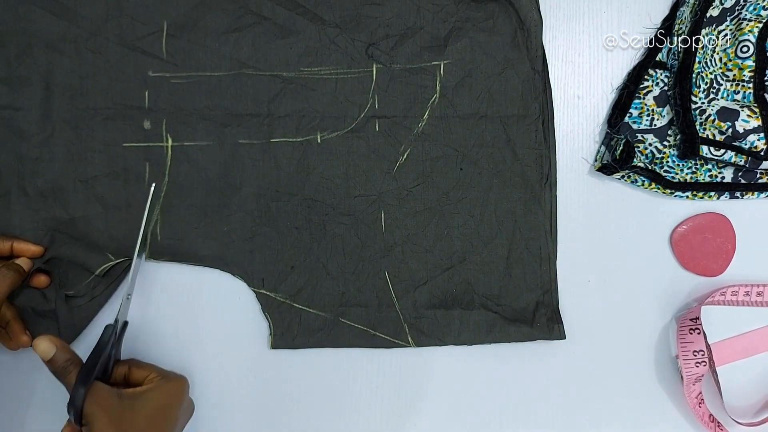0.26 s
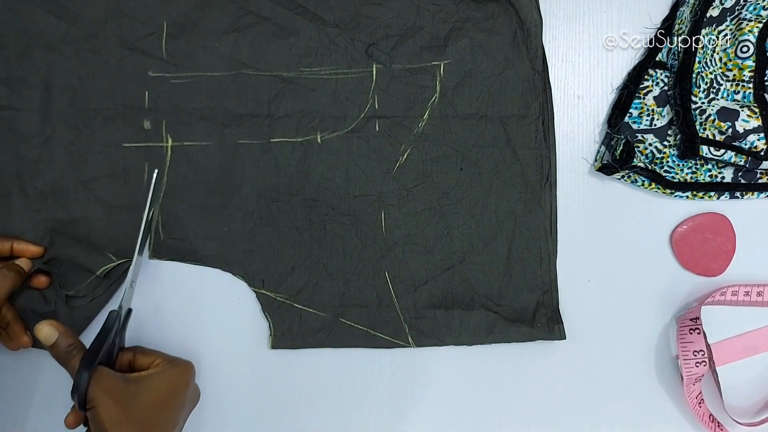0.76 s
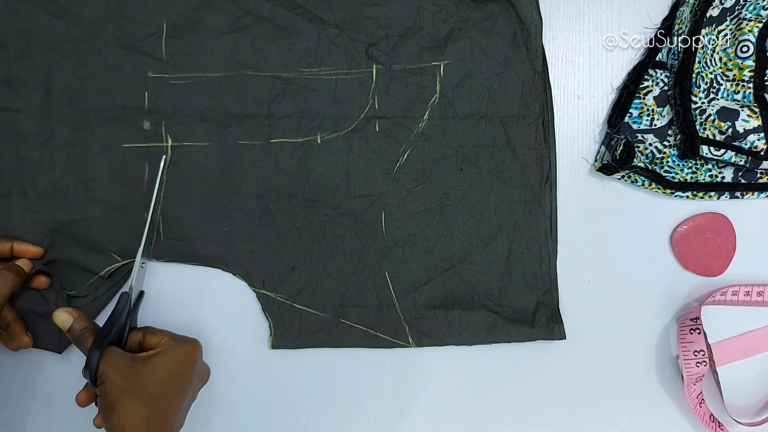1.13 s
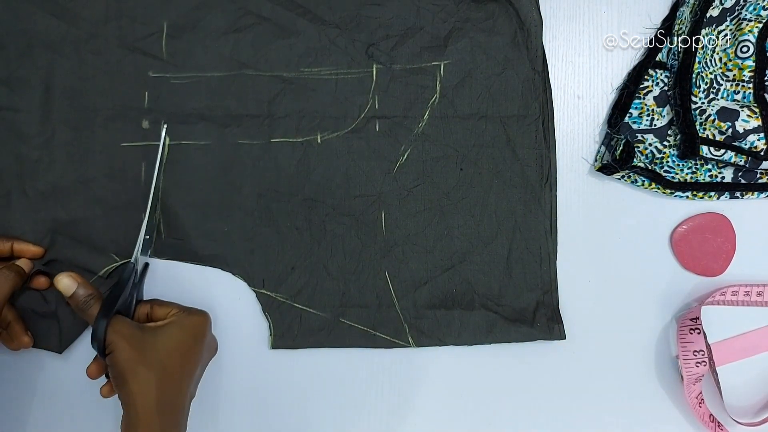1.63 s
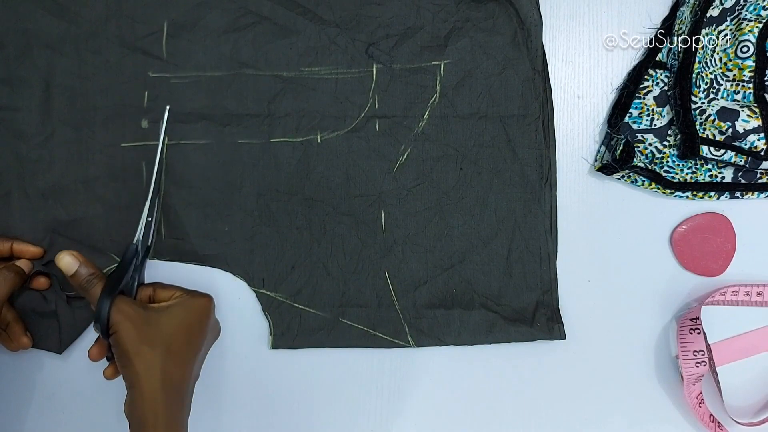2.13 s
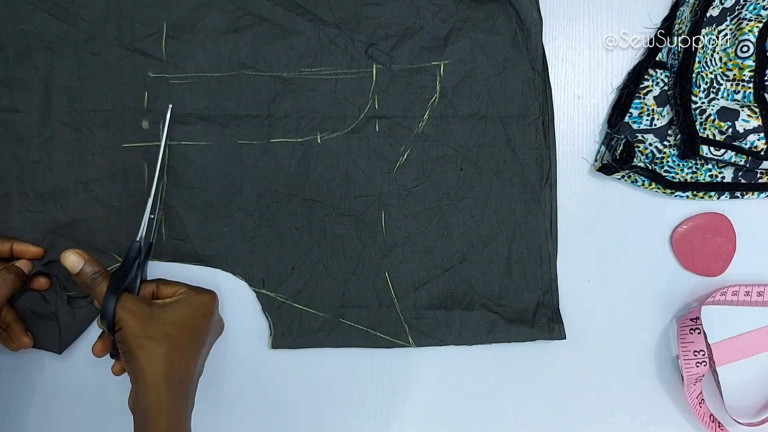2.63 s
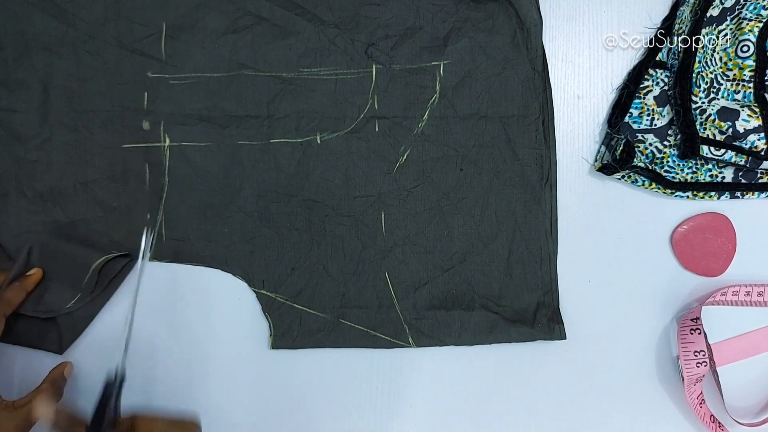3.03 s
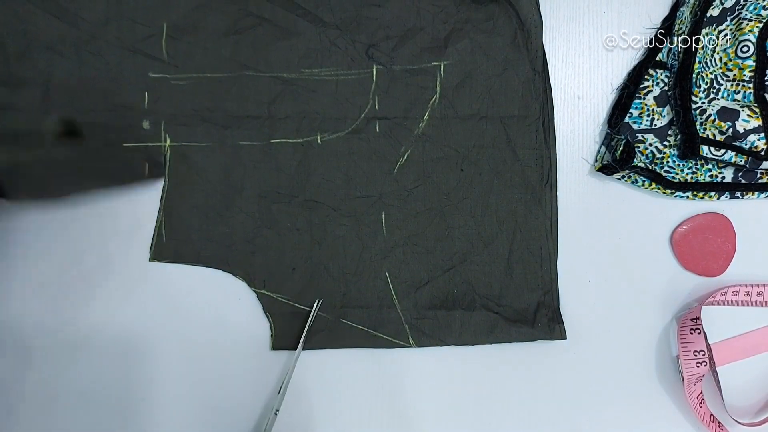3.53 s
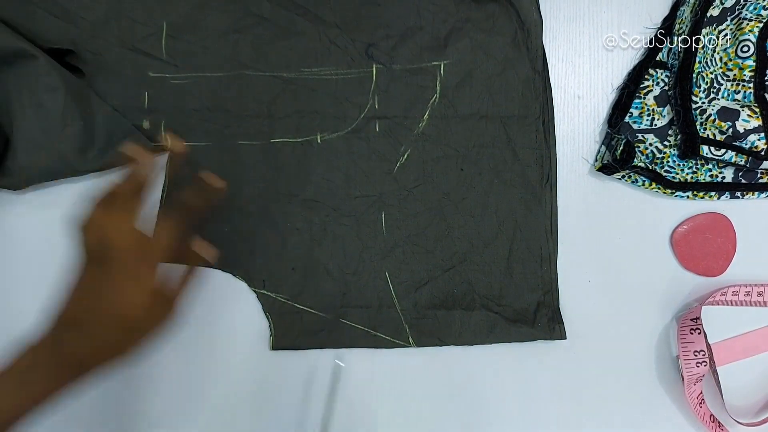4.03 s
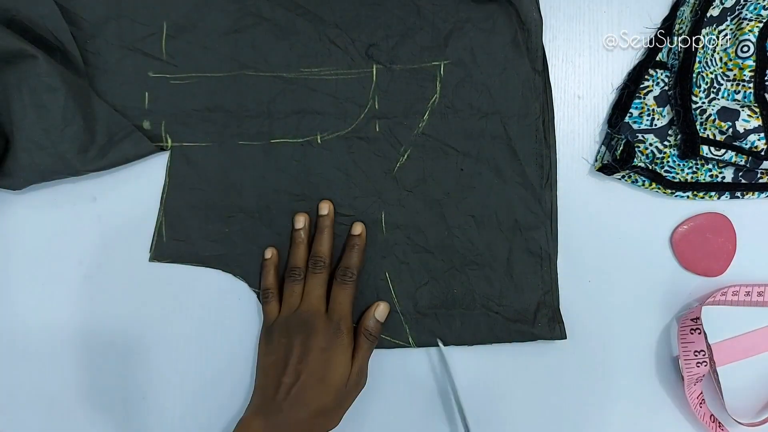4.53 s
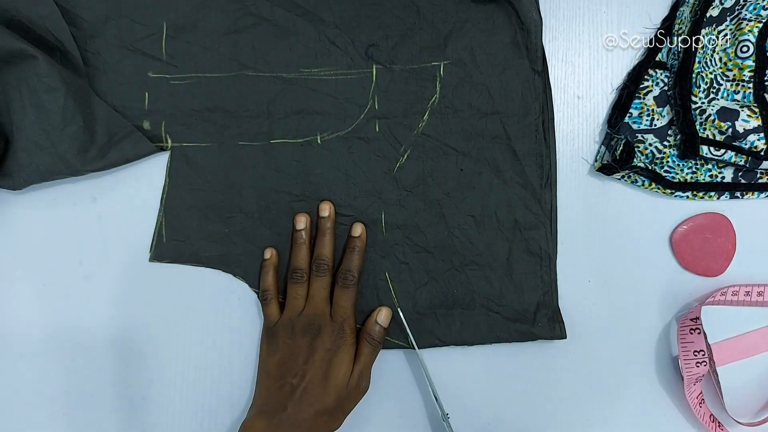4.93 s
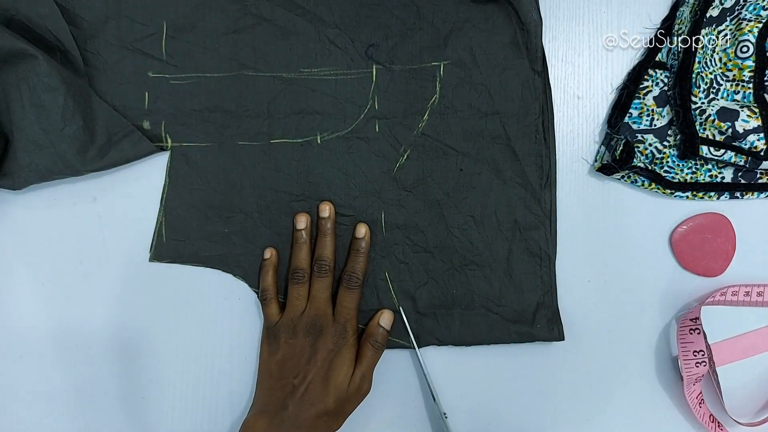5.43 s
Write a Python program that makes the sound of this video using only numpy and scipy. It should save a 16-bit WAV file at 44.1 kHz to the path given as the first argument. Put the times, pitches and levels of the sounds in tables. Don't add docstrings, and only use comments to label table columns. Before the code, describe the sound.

Close stereo sound of steel scissors cutting cloth on a hollow table in a quiet room. Crunchy snips come about every 0.6 seconds for three seconds, with small knocks between and one loud clack. Then a dull thud, faint cloth rustling, a firm landing with a short dragging rub, and a final crisp snip. Low hum and distant rumble continue underneath.

```python
import sys
import numpy as np
from scipy import signal
from scipy.fft import rfft, irfft
from scipy.io import wavfile
from scipy.ndimage import uniform_filter1d

SR = 44100
rng = np.random.default_rng(int(sys.argv[2]) if len(sys.argv) > 2 else 0)


def ratio(d):
    e = np.asarray(d, float) / 20
    return 10 ** e


def put_to_file(sound):
    columns = np.atleast_2d(sound).T
    safe = np.clip(columns, -1, 1)
    whole_steps = np.round(safe * 32767)
    wavfile.write(sys.argv[1], SR, whole_steps.astype(np.int16))


N = 250047


def evened(x):
    return x / np.sqrt(np.mean(x ** 2) + 1e-20)


def interpolated(points, hz):
    f, value = np.transpose(points)
    return np.interp(np.log(hz + 1), np.log(f + 1), value)


def causal(db):
    log_gain = np.log(ratio(np.maximum(db, -100)))
    both_sides = np.r_[log_gain, log_gain[-2:0:-1]]
    return np.exp(np.conj(signal.hilbert(both_sides)))[:len(db)]


def response(points, modes=(), modes_db=-100., lift_db=0., lift_hz=1660.0):
    hz = np.fft.rfftfreq(8192, 1 / SR)
    broad = ratio(interpolated(points, hz)) ** 2
    peaks = sum(ratio(db) ** 2 / (1 + (2 * (hz - f) / width) ** 2) ** 2 for f, width, db in modes)
    shape_db = 10 * np.log10(broad + ratio(modes_db) ** 2 * peaks + 1e-12)
    shape_db += lift_db * np.clip(5 * (hz / lift_hz - 1), 0, 1)
    h = irfft(causal(shape_db))[:3000]
    return h / np.linalg.norm(h)


def colour(x, h):
    return signal.oaconvolve(x, h)[:N]


def room(x, t60, wet_db, left_db, lag_samples=0):
    t = np.arange(4096) / SR
    echoes = rng.standard_normal((2, len(t))) * ratio(-60 * t / t60) * (t > .0005)
    echoes *= ratio(wet_db) / np.linalg.norm(echoes[0])
    echoes[:, 0] = 1
    paths = []
    for spectrum, lag in zip(rfft(echoes, 16384), (lag_samples, 0)):
        colouring_db = 20 * np.log10(abs(spectrum) + 1e-4)
        path = irfft(spectrum / causal(0.83 * colouring_db))[:len(t)]
        paths.append(np.roll(path, lag) / np.linalg.norm(path))
    return signal.oaconvolve(x[None], np.array(paths), axes=1)[:, :N] * ratio([[left_db / 2], [-left_db / 2]])


def patchy(x, patch_db, sway):
    z = signal.stft(x, nperseg=256)[2]
    blobs = rng.standard_normal((z.shape[2], z.shape[1], 2)).T
    blobs = uniform_filter1d(uniform_filter1d(blobs, size=6, axis=1), size=5, axis=2)
    level, turn = map(evened, blobs)
    fade = np.linspace(1.25, .45, z.shape[1])[:, None]
    z = z * evened(ratio(patch_db * level)) * np.exp(1j * sway * fade * np.array([turn, -turn]))
    return signal.istft(z, nperseg=256)[1][:, :N]


def snaps(per_s, spread_db):
    size = ratio(spread_db * np.minimum(rng.exponential(1, N), 4)) * rng.choice([-1., 1.], N)
    return size * (rng.random(N) < per_s / SR)


# hz, level_db (per Hz)
AIR_SPECTRUM = [(82, -31), (140, -3.5), (155, -4.5), (221, -9.5), (309, -3), (539, -11.5), (607, -16.5),
                (1020, -25.5), (1240, -28), (2690, -41.5), (7530, -45), (11200, -34), (14200, -36.5),
                (16000, -44)]
# hz, lift_db
AIR_LIFT = [(400, -0.5), (800, 4), (1500, 1), (2300, 5), (4500, 0.7)]
# hz, level_db (per Hz)
RUMBLE_SPECTRUM = [(15, -38), (30, -18), (50, -16), (80, 9), (110, 3.5), (140, -12), (200, -40), (300, -92)]
# hz, likeness (-1 to 1)
PORT_LIKENESS = [(60, 0.94), (150, 0.91), (380, 0.65), (950, 0.13), (2380, 0.049), (5980, 0.32),
                 (15000, 0.93)]


def air():
    frames, hz = N // 512 + 5, np.fft.rfftfreq(2048, 1 / SR)
    a, b, c, d, patches = rng.standard_normal((frames, 1025, 5)).T
    patches = evened(uniform_filter1d(uniform_filter1d(patches, size=24, axis=0), size=10, axis=1))
    same = np.clip(interpolated(PORT_LIKENESS, hz), -1, 1)[:, None]
    left, other = a + 1j * b, c + 1j * d
    z = np.array([left, same * left + np.sqrt(1 - same ** 2) * other])
    murmur = ratio(interpolated(AIR_SPECTRUM, hz) + interpolated(AIR_LIFT, hz))
    rumble = ratio(interpolated(RUMBLE_SPECTRUM, hz))
    z *= (murmur + rumble)[:, None] * ratio(1.3 * patches)
    noise = signal.istft(z, nperseg=2048, noverlap=1536)[1][:, :N]
    return ratio(-57) * evened(noise) * ratio([[.8], [-.8]])


# time_s, level_db
LOW_SWELLS = [(.03, -55), (.36, -52), (.56, -54), (.75, -56), (.86, -51), (1., -62), (1.19, -52),
              (1.29, -57), (1.39, -54), (1.48, -56), (1.68, -58), (1.85, -54), (1.98, -56), (2.35, -48),
              (2.55, -55), (2.7, -48), (2.84, -50), (3.03, -53), (3.17, -54), (3.34, -50), (3.82, -53),
              (4.1, -60), (4.3, -57), (4.4, -55), (4.53, -49), (4.74, -51), (4.83, -52), (5., -60),
              (5.33, -56), (5.52, -60)]
# time_s, level_db
HIGH_SWELLS = [(.08, -51), (.2, -50), (.37, -49), (.52, -52), (.63, -45), (.74, -53), (.88, -47),
               (1.11, -54), (1.24, -45), (1.39, -49), (1.73, -45), (1.93, -47), (2.27, -49), (2.44, -48),
               (2.73, -51), (2.9, -55), (3.08, -54), (3.27, -48), (3.49, -46), (3.79, -49), (3.99, -52),
               (4.25, -49), (4.45, -45), (4.6, -52), (4.76, -49), (4.99, -49), (5.1, -53), (5.36, -42),
               (5.52, -48)]


def hum():
    out, t = np.zeros(N), np.arange(N) / SR
    # pitch_hz, width_hz, swells, swell half-length_s, steady level_db
    modes = [(64., 3., LOW_SWELLS, .042, -67), (101.6, 1.5, HIGH_SWELLS, .038, -57.5)]
    for hz, width_hz, swells, swell_s, steady_db in modes:
        slow = uniform_filter1d(uniform_filter1d(rng.standard_normal(N), size=3000), size=3000)
        wander = width_hz * evened(slow)
        power = ratio(steady_db) ** 2
        power += sum(ratio(top_db) ** 2 * np.exp(-((t - s) / swell_s) ** 2) for s, top_db in swells)
        out += np.sqrt(2 * power) * np.sin(2 * np.pi * np.cumsum(hz + wander) / SR)
    return np.array([np.roll(out, 5), out]) * ratio([[.6], [-.6]])


def toot():
    start_s, end_s, level_db = 2.125, 2.295, -49.5
    pitch_hz, sag_hz_per_s, throbs_per_s = 422, -50, 20
    t = np.arange(N) / SR - start_s
    held = np.clip(np.minimum(t, end_s - start_s - t) / .015 + 1, 0, 1)
    throb = 1 + .55 * np.cos(2 * np.pi * throbs_per_s * (t - .012))
    turn = 2 * np.pi * (pitch_hz + sag_hz_per_s * t / 2) * t
    tone = np.sin(turn) + ratio(-30) * np.sin(2 * turn) + ratio(-30) * np.sin(3 * turn)
    return np.sqrt(2) * ratio(level_db - 35 * np.maximum(t - .06, 0)) * held * throb * tone


def thrum():
    middle_s, half_s, pitch_hz, level_db = 1.82, .05, 174, -52
    t = np.arange(N) / SR - middle_s
    return np.sqrt(2) * ratio(level_db) * np.exp(-(t / half_s) ** 2) * np.sin(2 * np.pi * pitch_hz * t)


# hz, level_db (per Hz)
SCRAPE_SPECTRUM = [(1120, -37), (1900, -1), (2050, 0), (2700, -5), (4540, -14), (6000, -15), (7800, -47),
                   (13200, -120)]


def drag():
    start_s, end_s, mode_hz, width_hz = 4.41, 4.75, 530, 120
    since = np.arange(N) / SR - start_s
    stroke = np.sin(np.pi * np.clip(since / (end_s - start_s), 0, 1) ** .8) ** 2
    mode = response([(0, -100), (1, -100)], [(mode_hz, width_hz, 0)], modes_db=0)
    slowing = (since > 0) * np.clip(1.3 - since / 0.39, 0, 1.3)
    grip = 1 + 4 * np.exp(-abs(since) / .02)
    slips = colour(evened(snaps(per_s=700, spread_db=2.0)), mode)
    rasp = colour(evened(snaps(per_s=6000, spread_db=3.0)), response(SCRAPE_SPECTRUM))
    return ratio(-36.5) * stroke * slips + ratio(-57.5) * slowing * grip * rasp


def strokes(rows, shape, parts_db, crisp=(0, 0, 1, 1)):
    rise, growth_db, fall = shape
    eager = (1, 1, 1.1, .45)
    quick = (1, 1, .9, 1.25)
    t, out = np.arange(N) / SR, np.zeros((4, N))
    for start, end, db, crisp_db in rows:
        near = slice(max(round((start - .3) * SR), 0), round((end + .4) * SR))
        left = np.clip((end - t[near]) / (end - start), 0, 1)
        level_db = db - growth_db * np.outer(eager, left)
        level_db -= rise * np.maximum(start - t[near], 0)
        level_db = level_db - fall * np.outer(quick, np.maximum(t[near] - end, 0))
        share_db = np.array(parts_db) + crisp_db * np.array(crisp)
        out[:, near] += ratio(level_db + share_db[:, None]) ** 2
    return out


# bite_s, shut_s, effort_db, crispness_db
SNIPS = [
    (-.06, .014, -42, 0),
    (.518, .585, -41, 0.5),
    (1.105, 1.165, -43, 3),
    (1.703, 1.785, -43, 2),
    (2.308, 2.372, -44.5, 1),
    (2.94, 2.992, -50.5, -2),
    (5.314, 5.395, -45, 3),
]
# start_s, end_s, effort_db, crispness_db
NUDGES = [(.125, .165, -51, 0), (.3, .39, -68, 4), (.712, .778, -50.5, -1), (1.32, 1.38, -55, 2),
          (1.9, 1.96, -51, 1), (2.125, 2.23, -61, -3), (2.496, 2.51, -60, 3), (2.96, 3.0, -56, 11),
          (4.47, 4.56, -47, 7), (4.58, 4.67, -52, 3), (4.755, 4.765, -57, -2), (5.168, 5.18, -70, 3),
          (5.58, 5.618, -46.5, 1)]
# start_s, end_s, effort_db, blade_drag_db
BRUSHES = [(.2, .46, -80, 8), (.8, .96, -81, 3), (2.89, 2.95, -69, 6), (3.05, 3.18, -76, 15),
           (3.25, 3.4, -79, 5), (3.43, 3.54, -77, 20), (3.7, 4.05, -79, 0), (4.135, 4.155, -60.5, 3),
           (4.2, 4.36, -77, 13), (4.49, 4.55, -63, 0), (4.6, 4.69, -59.5, 0), (4.75, 4.835, -54, 0)]
# start_s, end_s, effort_db, crispness_db
LANDINGS = [
    (1.171, 1.19, -37, -1),
    (5.373, 5.388, -45, 8),
    (1.297, 1.305, -51, 3),
    (3.496, 3.503, -42, -26),
    (4.411, 4.418, -41, 2),
    (5.568, 5.578, -48, 0),
]


def action():
    slow = uniform_filter1d(uniform_filter1d(rng.standard_normal(N), size=1500), size=1500)
    resting_db, fidget_db = (-66, -80, -94, -94), (2.5, 3, 2, 2)
    power = ratio(np.array(resting_db)[:, None] + np.outer(fidget_db, evened(slow))) ** 2
    power += strokes(SNIPS, shape=(950, 7, 195), parts_db=(0.5, 0, -5.5, -9))
    power += strokes(NUDGES, shape=(700, 1, 260), parts_db=(-2, 0, -10, -22))
    power += strokes(LANDINGS, shape=(9000, 0, 230), parts_db=(-4, -2, -5, -15), crisp=(-.22, .1, 1, 1))
    power += strokes(BRUSHES, shape=(260, 2, 190), parts_db=(-15, -15, -14, 0), crisp=(0, 0, 1, 0))
    return 10 * np.log10(power)


# time_s, peak_db, brightness_db, ring_t60_s
KNOCKS = [(0.118, -42, -17, 0.049), (0.287, -54, -17, 0.055), (0.506, -41.5, -8, 0.053),
          (0.708, -37, -16, 0.067), (0.957, -57, -17, 0.06), (1.079, -40.5, -16, 0.049),
          (1.127, -29.5, -21, 0.06), (1.17, -23.5, -11.5, 0.1), (1.295, -38.5, -9, 0.074),
          (1.671, -47, -10, 0.06), (1.705, -37, -18, 0.06), (1.739, -31, -23, 0.071),
          (1.9, -38.5, -23, 0.06), (2.303, -37.5, -17, 0.06), (2.35, -28.5, -26, 0.06),
          (2.496, -44, -11, 0.052), (2.936, -39.5, -13, 0.081), (3.496, -30, -34, 0.076),
          (4.41, -27, -10, 0.08), (4.76, -38, -27, 0.06), (5.168, -57, -16, 0.065), (5.315, -38, -4, 0.069),
          (5.371, -31.5, -1, 0.06), (5.567, -34, -12, 0.075)]


def blows():
    low, high, t = np.zeros(N), np.zeros(N), np.arange(6000) / SR
    rattles = rng.standard_normal((len(KNOCKS), len(t)))
    for (time_s, db, bright_db, t60), rattle in zip(KNOCKS, rattles):
        blow = 0.077 * rattle * ratio(-60 * t / max(t60, .01))
        blow[0] = 1
        at = round(time_s * SR)
        felt_db = db + 0.35 * (db + 30.5)
        low[at:at + len(t)] += ratio(felt_db) * blow[:N - at]
        high[at:at + len(t)] += ratio(felt_db + bright_db) * blow[:N - at]
    return low, high


# hz, level_db (per Hz)
FRAME_SPECTRUM = [(79, -41.5), (135, -12.5), (156, -8), (199, -7), (232, -11), (280, -2), (323, 0.5),
                  (360, -5), (385, -5.5), (500, -31), (850, -120)]


def legs(threads, push_db, low_blows):
    frame = response(FRAME_SPECTRUM)
    shaken = ratio(push_db - 0.5) * colour(threads, frame)
    return shaken + ratio(-19.5) * colour(low_blows, frame) / abs(frame).max()


# hz, level_db (per Hz)
TABLE_SPECTRUM = [(270, -24), (455, 2), (502, -1.5), (544, -0.5), (647, -6.5), (802, -9.5), (882, -19.5),
                  (1000, -17), (1300, -41), (2200, -120)]
# pitch_hz, width_hz, level_db
TABLE_MODES = [(535, 96, 0.5), (725, 18, -3)]


def table(threads, load_db, low_blows):
    top = response(TABLE_SPECTRUM, TABLE_MODES, modes_db=1.0, lift_db=1.5, lift_hz=590.0)
    return ratio(load_db - 0.3) * colour(threads, top) + ratio(-5) * colour(low_blows, top) / abs(top).max()


# hz, level_db (per Hz)
FIBRE_SPECTRUM = [(2820, -44.5), (4800, -11), (5970, -7), (7140, -6.5), (8190, -12.5), (9790, -6.5),
                  (12400, -10.5), (14000, 1), (14700, -5), (15600, -11.5), (16200, -20)]
# hz, level_db (per Hz)
BRUSH_SPECTRUM = [(2650, -31), (4500, -8.5), (5490, -13), (6510, -9.5), (8420, -8.5), (9680, -0.5),
                  (12600, -2), (15100, -9.5), (16200, -15)]


def fibres(rasp_db, hiss_db):
    fizz = evened(snaps(per_s=9000, spread_db=2.0))
    brushing = np.clip(np.maximum((hiss_db - rasp_db + 2.5) / 11, (-57 - hiss_db) / 8), 0, 1)
    cut = (1 - brushing) * colour(fizz, response(FIBRE_SPECTRUM))
    return ratio(hiss_db + 1.3) * (cut + brushing * colour(fizz, response(BRUSH_SPECTRUM)))


# time_s, peak_db
TICKS = [
    (1.1717, -25),
    (1.298, -48),
    (4.411, -32),
    (5.1048, -56),
    (5.5687, -39),
]


def pivot():
    clicks, weave = np.zeros(N), response(FIBRE_SPECTRUM)
    for time_s, db in TICKS:
        clicks[round(time_s * SR)] = ratio(db - 4)
    return colour(clicks, weave) / abs(weave).max()


# hz, level_db (per Hz)
BLADE_SPECTRUM = [(590, -41), (1000, -9), (1160, -8), (1330, -0.5), (1460, -5), (1590, 0.5), (2030, -15),
                  (2300, -16.5), (2680, -18.5), (3150, -13), (4050, -17.5), (4800, -30.5), (6240, -52),
                  (10600, -120)]
# pitch_hz, width_hz, level_db
BLADE_MODES = [(943, 22, -2), (1358, 55, -2.5), (1570, 48, -0.5), (2280, 33, -10.5), (3180, 57, -10),
               (3630, 31, -14)]
# hz, level_db (per Hz)
SLIDE_SPECTRUM = [(590, -35.5), (1000, -7), (1040, -9), (1160, -7.5), (1470, 0.5), (1960, -13), (2590, -21),
                  (3140, -18), (4000, -26), (5200, -57), (8800, -120)]


def blades(threads, rasp_db, hiss_db, high_blows):
    steel = response(BLADE_SPECTRUM, BLADE_MODES, modes_db=-2.0, lift_db=2.0)
    resting, scrape = response(SLIDE_SPECTRUM, lift_db=2.0), response(SCRAPE_SPECTRUM)
    rasp = evened(threads + 1.4 * evened(snaps(per_s=4000, spread_db=2)))
    biting = np.clip((hiss_db - rasp_db + 14) / 9, 0, 1) * (rasp_db > -66)
    biting = uniform_filter1d(biting, size=400)
    out = ratio(rasp_db + 3.5) * (biting * colour(rasp, steel) + (1 - biting) * colour(rasp, resting))
    out += ratio(-0.5) * colour(high_blows, resting) / abs(resting).max()
    return out + ratio(-5) * colour(high_blows, scrape) / abs(scrape).max()


def scissors():
    push_db, load_db, rasp_db, hiss_db = action()
    threads = evened(snaps(per_s=1800, spread_db=3.1))
    low, high = blows()
    wood = table(threads, load_db, low) + drag() + toot()
    out = room(wood, 0.056, -8, 3.2, lag_samples=9)
    out += room(legs(threads, push_db, low), 0.033, 2, 1.0, lag_samples=6)
    near = room(blades(threads, rasp_db, hiss_db, high), 0.075, 6.44, 3.9, lag_samples=10)
    near += room(fibres(rasp_db, hiss_db), 0.038, -3.5, 2.1)
    return out + patchy(near, patch_db=2.4, sway=0.5) + pivot()


def scene():
    return air() + hum() + thrum() + scissors()


def band_limit(x):
    return signal.sosfilt(signal.butter(12, 16490, fs=SR, output="sos"), x)


def record(dry):
    lowpass = signal.firwin(511, 15730, window=("kaiser", 7), fs=SR)
    limited = signal.oaconvolve(dry, lowpass[None], "same")
    return band_limit(limited)


dry = scene()
out = record(dry)
put_to_file(out)
```